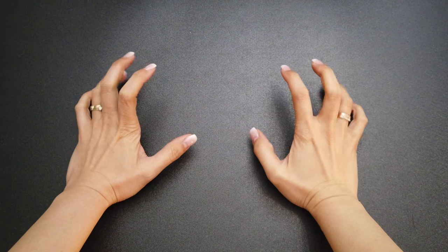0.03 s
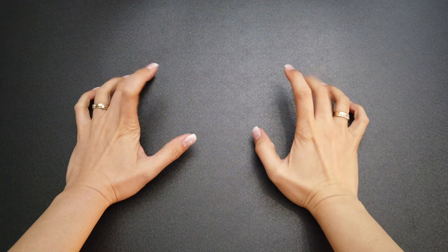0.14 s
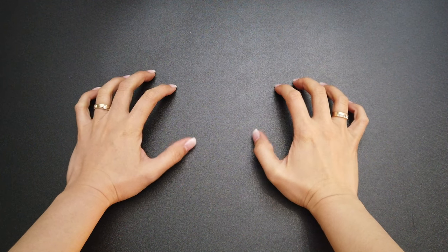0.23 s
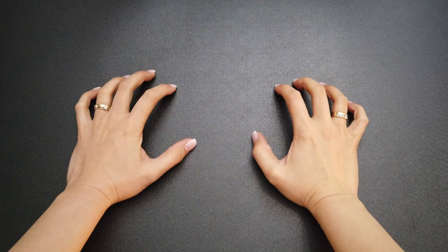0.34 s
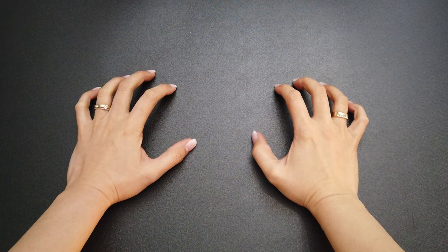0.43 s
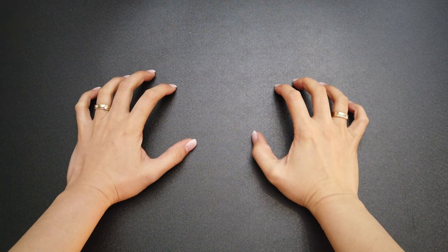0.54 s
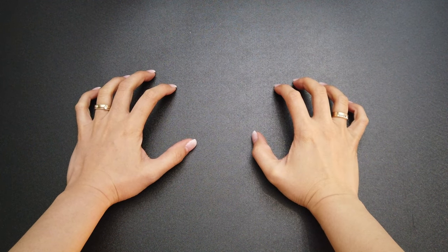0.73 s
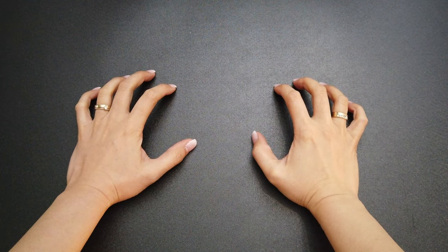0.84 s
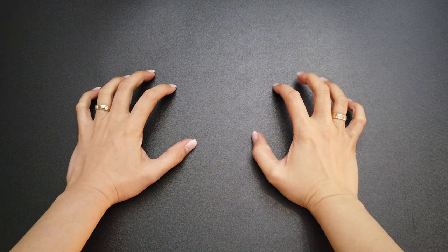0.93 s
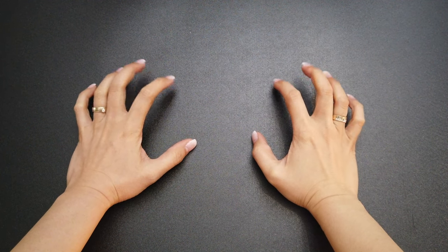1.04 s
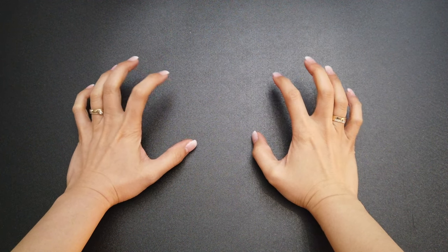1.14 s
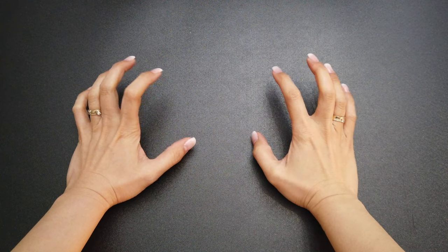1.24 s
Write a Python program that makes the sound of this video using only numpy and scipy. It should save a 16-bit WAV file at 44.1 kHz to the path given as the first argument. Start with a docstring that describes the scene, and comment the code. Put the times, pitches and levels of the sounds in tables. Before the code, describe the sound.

One quick roll of fingers tapping a table, nails clicking, the last taps loudest.

```python
"""Fingertips drop one after another on a tabletop in a small room, the last ones hardest.
Heard from a close pair of microphones, each pad gives a short hollow knock and a low thud,
sets the board ringing and rocks the table; the nails add a dry clack and a thin tick.
The room answers briefly, over a faint rumble of the building and a steady hiss."""
import sys
import numpy as np
from scipy import signal
from scipy.fft import rfft, irfft, next_fast_len
from scipy.io import wavfile

SR = 44100
rng = np.random.default_rng(int(sys.argv[2]) if len(sys.argv) > 2 else 0)


def master(y):
    """Save y as 16-bit WAV."""
    cut = np.clip(np.atleast_2d(y).T, -1, 1)
    pcm = np.round(cut * 32767)  # scale
    wavfile.write(sys.argv[1], SR, pcm.astype(np.int16))


N = 57330

# How alike a tap is at the two microphones. Each row: frequency in Hz, left-right correlation.
TAP_LIKENESS = [(60, 1), (250, 1), (500, .97), (1000, .92), (1900, .55), (3000, 0.076), (4500, -.25),
                (8000, -.1), (15000, -0.23)]


def pad(start, knock_db, thud_db, room_db=-16.5):
    """A fingertip pushes the top down: hollow knock, ringing board and low thud."""
    # Main resonances of the top, swelling and dying within a few cycles.
    # Each row: frequency in Hz, level in dB against the knock, peak time and width in seconds.
    top_modes = [(537.25, 0, .0042, .0034), (298.06, -14, .018, .012), (778.6, -16, 0.0037, .006)]
    # Low ringing of the board. Each row: frequency in Hz, dB against the knock, T60 in seconds.
    board_modes = [(140, -35, 0.69), (156.24, -31.5, .65), (189.16, -21.5, 0.32), (283.1, -23.5, 0.39),
                   (325.83, -24.5, .17), (372.16, -35.5, 0.57), (385.5, -33, .25), (439.5, -30, 0.3),
                   (487.1, -16.5, 0.3), (551.5, -22.5, .17), (616.6, -19.5, 0.22), (743.6, -21, 0.26),
                   (784.8, -20, 0.2), (817.3, -23.5, .2)]
    # The whole table giving way. Each row: frequency in Hz, dB against the thud, T60 in seconds.
    thud_modes = [(97.4, 0.5, 0.045), (116.4, -5, .19)]
    # The knock's colour in the room. Each row: frequency in Hz, relative level in dB.
    knock_room = [(60, -26.5), (200, -9), (240, -13.5), (300, -7.5), (390, -11.5), (560, 0.5), (680, -8.5),
                  (850, -7), (1300, -11.5), (2000, -24), (5000, -56)]
    t = since(start)
    knock = sum(amp(db) * np.sin(2 * np.pi * hz * t) * np.exp(-((t - peak) / width) ** 2)
                for hz, db, peak, width in top_modes)
    board = ring(board_modes, t, rise_s=0.007)
    reverb = amp(room_db) * room(knock_room, start)
    thud = ring(thud_modes, t, rise_s=0.0019)
    return amp(knock_db) * (board - knock + reverb) - amp(thud_db) * thud


def nail(start, clack_db, tick_db, tilt, rise_s):
    """The hard nail clacks on the surface and wakes the high modes, with a thin tick on top."""
    # Colours of the direct clack, the clack in the room and the tick.
    # Each row: frequency in Hz, relative level in dB (the clack's two before the tilt).
    clack_colour = [(150, -20), (500, -5), (850, -2.5), (1350, -9), (1650, -8.5), (2050, -1.5), (2450, -14),
                    (3200, -14.5), (3950, -18), (4700, -27.5), (7000, -35.5), (15000, -53.5)]
    clack_room = [(100, -19), (400, 1), (800, 0.5), (1350, -3.5), (1650, -4.5), (2050, -3), (2450, -6),
                  (3200, -7.5), (3950, -10), (4600, -15), (5700, -21), (6700, -28.5), (9000, -27.5),
                  (15000, -44.5)]
    tick_colour = [(2000, -22), (4500, 5.5), (6500, -18.5), (9300, -9), (10400, 6), (12000, -1.5),
                   (14000, -11.5), (16000, -11)]
    # High ringing of the board. Each row: frequency in Hz, relative level in dB, T60 in seconds.
    high_modes = [(727.1, -19.5, .15), (823.3, -3.5, .022), (899, -24, .2), (983, -32.5, 0.27),
                  (1199, -19, 0.15), (1256.3, -20, 0.16), (1361, -4.5, .024), (1410.9, -20.5, 0.11),
                  (1971, -20, 0.079), (2054.9, -21.5, .11), (2628, -27.5, 0.15), (3080, -29, .12),
                  (3968.5, -34.5, 0.27)]
    t = since(start)
    clack = amp(-3) * noise(brighten(clack_colour, tilt), TAP_LIKENESS) * fade(t, rise_s, t60=0.021)
    clack += ring(brighten(high_modes, tilt), t, rise_s=0.006)
    clack += amp(-14) * room(brighten(clack_room, tilt), start)
    tick = amp(-8) * noise(tick_colour, TAP_LIKENESS) * fade(t, rise_s, t60=0.022)
    tick += amp(-21.5) * room(tick_colour, start)
    return amp(clack_db) * clack + amp(tick_db) * tick


def sway(start, sway_db, hz=46):
    """The weight of the finger rocks the table on its legs."""
    t = since(start)
    return amp(sway_db) * np.sin(2 * np.pi * hz * t) * fade(t, rise_s=0.0055, t60=0.11)


def room(spectrum, start, rise_s=0.0091):
    """The small room's diffuse answer to a blow; each frequency dies at its own speed."""
    # Reverberation time. Each row: frequency in Hz, T60 in seconds.
    room_t60 = [(100, .35), (300, 0.51), (600, .27), (2000, 0.2936), (5000, .29), (12000, .23)]
    hz, t, bands = signal.stft(noise(spectrum, TAP_LIKENESS), SR, nperseg=256)
    decay = amp(-60 * np.maximum(t - start, 0) / along(room_t60, hz)[:, None])
    tail = signal.istft(bands * decay, SR, nperseg=256)[1][:, :N]
    return tail * (1 - np.exp(-(since(start) / rise_s) ** 2))


def background(rumble_db=-62.5, hiss_db=-67):
    """Room tone: low rumble of the building and steady hiss."""
    # Colours of the rumble and the hiss. Each row: frequency in Hz, relative level in dB.
    rumble_colour = [(10, -17.5), (22, -3), (55, -4.5), (80, -15), (110, -21), (180, -19), (240, -30.5),
                     (300, -27.5), (420, -50), (1500, -68)]
    hiss_colour = [(60, -2.5), (300, -1.5), (420, -5.5), (560, -3.5), (1450, -6.5), (1650, -3.5),
                   (1900, -8.5), (3000, -11.5), (4200, -16.5), (5300, -13.5), (6500, -21), (7500, -16),
                   (9800, -17), (10700, -12), (11600, -22), (12500, -24), (13200, -40), (15500, -47.5)]
    # Likeness at the two microphones. Each row: frequency in Hz, left-right correlation.
    likeness = [(30, -0.043), (130, .75), (300, 0.58), (700, 0.276), (3000, .1), (10000, -0.088)]
    rumble = amp(rumble_db) * noise(rumble_colour, likeness, ripple_db=1.5)
    hiss = amp(hiss_db) * noise(hiss_colour, likeness, ripple_db=1.74)
    return rumble + hiss


def ring(modes, t, rise_s):
    """Damped modes, a little different in level at each blow."""
    return sum(amp(db + rng.normal(0, 1)) * np.sin(2 * np.pi * hz * t) * fade(t, rise_s, t60)
               for hz, db, t60 in modes)


def noise(spectrum, likeness, ripple_db=2.5, ripple_step_hz=55.54):
    """Coloured stereo noise of rms 1, with narrow random peaks and dips like densely packed modes."""
    size = next_fast_len(N + 8192)
    hz = np.fft.rfftfreq(size, 1 / SR)
    spread = np.arccos(np.clip(along(likeness, hz), -1, 1)) / 2  # angle from mid towards side
    ripple = ripple_db * np.interp(hz / ripple_step_hz, np.arange(len(hz)), rng.standard_normal(len(hz)))
    phases = np.exp(2j * np.pi * rng.random((2, len(hz))))
    gain = amp(along(spectrum, hz) + ripple)
    mid, side = irfft(phases * gain * [np.cos(spread), np.sin(spread)], size)[:, :N]
    stereo = np.array([mid + side, mid - side])
    return stereo / np.sqrt(np.mean(stereo ** 2) + 1e-20)


def brighten(rows, tilt, pivot_hz=2000):
    """Rows of (Hz, dB, ..) tilted by so many dB per octave."""
    return [(hz, db + tilt * np.log2(hz / pivot_hz), *rest) for hz, db, *rest in rows]


def fade(t, rise_s, t60):
    """A quick rise and a decay of 60 dB in t60 seconds."""
    return (1 - np.exp(-t / rise_s)) * amp(-60 * t / t60)


def since(start):
    """Seconds since start at every sample, zero before."""
    return np.maximum(np.arange(N) / SR - start, 0)


def along(points, hz):
    """(Hz, value) points read on a log frequency axis."""
    point_hz, values = np.transpose(points)
    return np.interp(np.log(hz + 1), np.log(point_hz + 1), values)


def amp(db):
    """Decibels to gain."""
    return 10 ** (np.asarray(db) / 20)


def scene():
    """The fingers land close to the microphones in the quiet room."""
    # Finger landings. Each row: start in seconds, gains of knock, thud, sway, clack and tick in dB,
    # clack tilt in dB per octave, rise of the nail's contact in seconds.
    taps = [(0.1246, -48, -47.5, -68, -46, -76.5, -0.5, 0.00097),
            (0.1696, -30.5, -49.5, -46.5, -32, -70, 1.5, 0.0015),
            (0.2089, -25, -39.5, -39.5, -27, -62.5, 1.5, 0.0027),
            (0.2785, -39, -27.5, -55, -19, -57, -1.1, .0012),
            (0.2893, -12.5, -32.5, -55, -16.5, -45.5, -1, .0012),
            (0.3710, -24.5, -29.5, -47.5, -13.5, -33, -3, .0006),
            (0.3774, -11.5, -28.5, -40.5, -17, -30, 0, 0.00049)]
    mix = background()
    for start, knock_db, thud_db, sway_db, clack_db, tick_db, tilt, rise_s in taps:
        mix += pad(start, knock_db, thud_db) + sway(start, sway_db)
        mix += nail(start, clack_db, tick_db, tilt, rise_s)
    return mix


def record(dry, top_hz=15750):
    """The recorder keeps nothing above its band limit."""
    size = next_fast_len(N + SR // 2)
    passband = np.fft.rfftfreq(size, 1 / SR) < top_hz
    return irfft(rfft(dry, size) * passband, size)[:, :N]


dry = scene()
out = record(dry)
master(out)
```